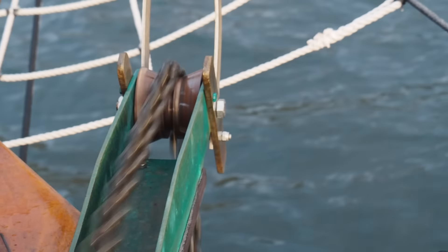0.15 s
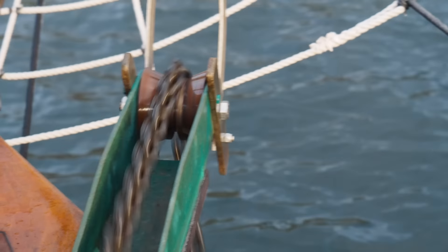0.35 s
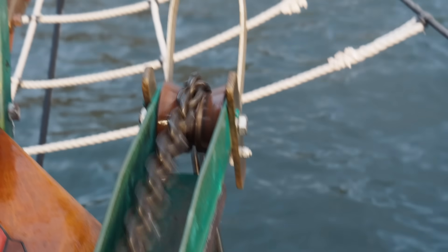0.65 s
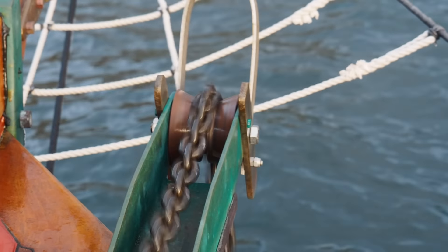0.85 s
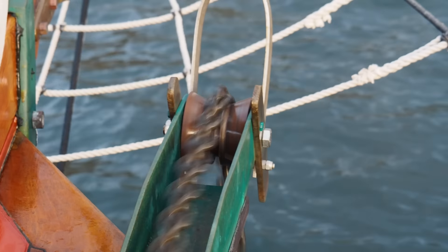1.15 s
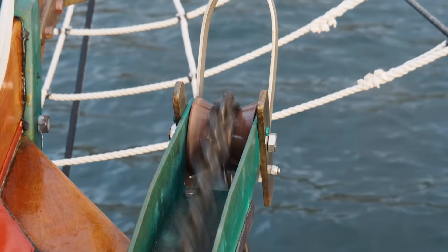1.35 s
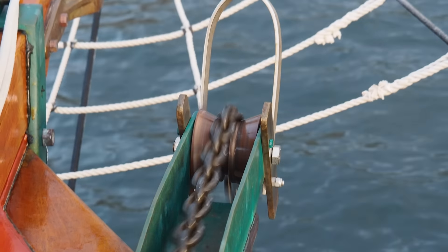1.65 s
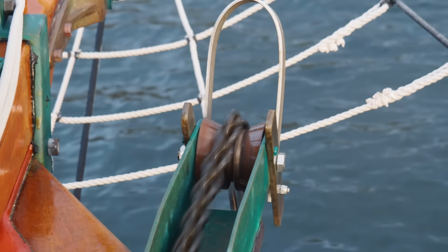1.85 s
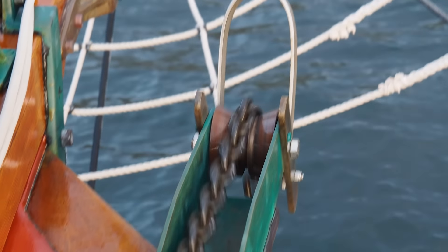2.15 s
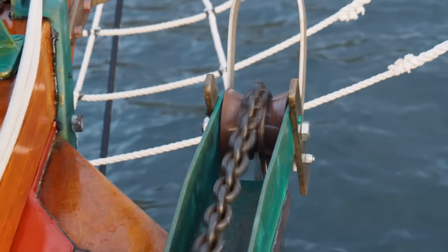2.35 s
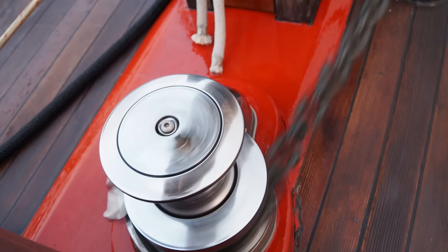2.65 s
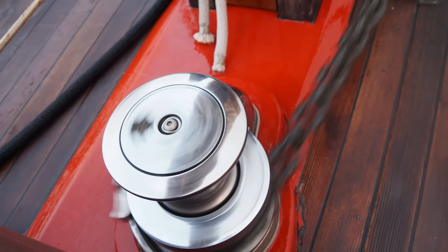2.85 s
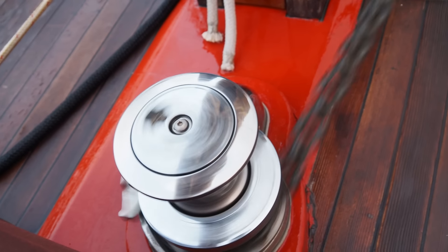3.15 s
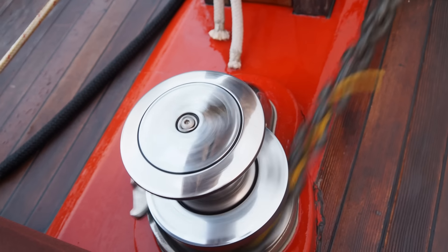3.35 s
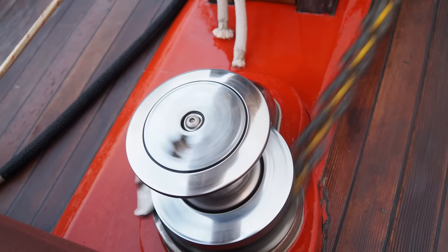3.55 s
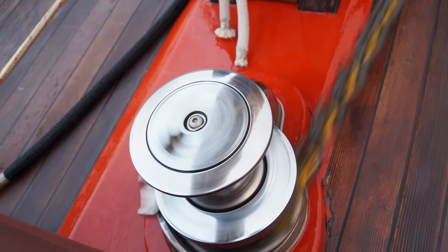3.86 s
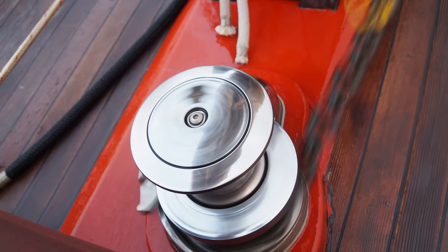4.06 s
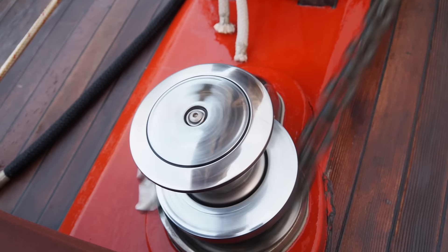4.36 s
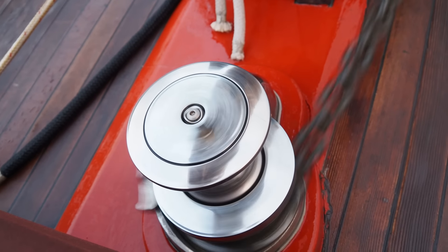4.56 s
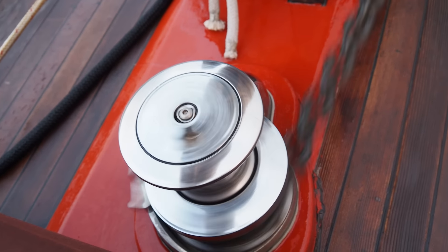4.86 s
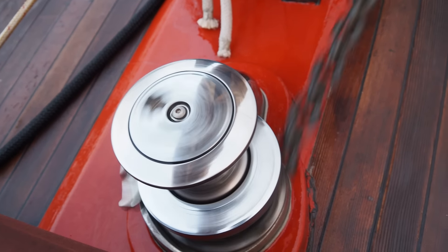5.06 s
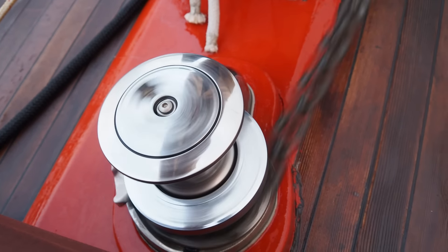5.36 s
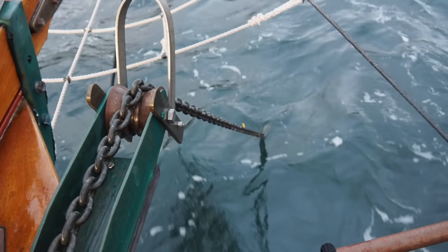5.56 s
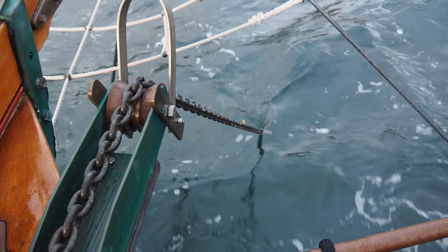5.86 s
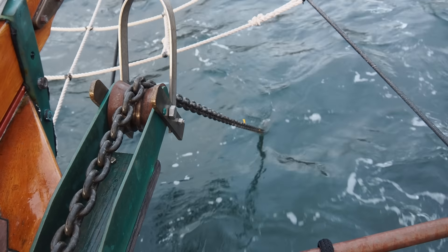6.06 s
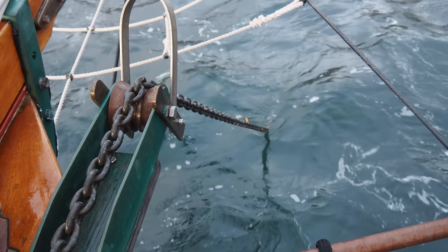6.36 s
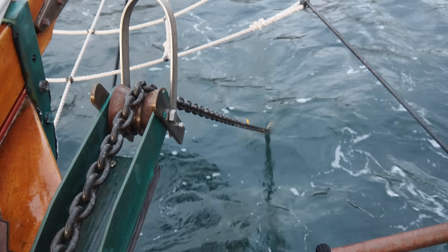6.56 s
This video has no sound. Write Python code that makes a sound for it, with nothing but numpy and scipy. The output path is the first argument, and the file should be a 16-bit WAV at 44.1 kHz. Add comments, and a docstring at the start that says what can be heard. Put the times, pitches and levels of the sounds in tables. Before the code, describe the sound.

Close up at a boat's bow, heavy anchor chain runs quickly over a metal roller, clattering evenly with deep thumps and irregular clanks. It drops away into a short silence. Then chain rattles through a windlass wheel on a wooden deck, brighter and faster, with hard snaps and short grinding. Finally engine hum and churning, gurgling water rise as the chain fades out.

```python
"""First comes anchor chain clattering over the bow roller; after a short silence, an electric windlass on deck.
The links arrive in pairs, upright then flat: shaped noise bursts clack, scrape and ring modes of the steel,
and longer noise bursts thud through the boat's structure. Clanks, snaps and grinding links stand out.
At the end the chain fades under an engine's hum of wavering sines and churning water of noise and bubbles.
Two microphone ports hear each place with its own balance, likeness and lead in time."""
import sys
import numpy as np
from scipy import signal
from scipy.fft import rfft, irfft
from scipy.io import wavfile
from scipy.ndimage import uniform_filter1d

SR = 44100
rng = np.random.default_rng(int(sys.argv[2]) if len(sys.argv) > 2 else 0)


def write(x):
    x = np.atleast_2d(x).T
    wavfile.write(sys.argv[1], SR, np.round(np.clip(x, -1, 1) * 32767).astype(np.int16))


N = 295320

# Water and engine together. Each row: time in seconds, level in dB.
WATER_LEVEL = [(5.7, -62), (5.81, -53.5), (5.9, -45.5), (6.12, -43.5), (6.3, -41), (6.7, -40.5)]
WATER_START_S = WATER_LEVEL[0][0]
# Colour of the churning water. Each row: frequency in Hz, relative density in dB per Hz.
WATER_COLOUR = [(30, -39), (55, -25), (85, -8), (130, 0), (180, 0.5), (290, -13), (390, -3.5), (560, -12),
                (640, -10), (1100, -16), (2300, -28.5), (6000, -41), (15000, -42)]
# Surges of the water. Each row: centre in seconds, lift above the churning in dB.
SURGES = [(5.91, 5.5), (5.966, 2), (6.06, 3.5), (6.22, 3.5), (6.5, 3)]
# Firing orders of the engine. Each row: multiple of ENGINE_HZ, level against the churning in dB.
ENGINE_ORDERS = [(1, -25), (2, -9.5), (3, -9.5), (4, -13.5)]
ENGINE_HZ = 57.85  # the pitch wavers around this

# The structure that blows shake, at the bow and on deck.
# Each row: frequency in Hz, relative density in dB per Hz.
ROLLER_BODY = [(35, -35), (55, -35), (80, -15.5), (125, 1), (200, 0.5), (278, -17), (385, 3.5),
               (535, -15.5), (630, 1), (820, -1.5), (1150, -18.5), (1500, -24), (3000, -39)]
DECK_BODY = [(35, -69), (60, -39), (90, -5.5), (135, 7), (200, 4), (275, -9), (370, 4.5), (500, 2),
             (565, -5.5), (620, -3), (1050, -3), (1250, -24), (1450, -1), (3000, -30.5)]
# Broad clatter of steel on steel. Each row: frequency in Hz, relative density in dB per Hz.
BOW_CLATTER = [(105, -11), (610, 1.5), (1520, -1), (2620, -11), (3620, -3.5), (5420, -3), (6320, -10.5),
               (8720, -5.5), (10420, -13.5), (12520, -16), (14020, -29), (16020, -35.5)]
DECK_CLATTER = [(105, -15.5), (610, -2.5), (1520, -2), (2220, -6), (3620, -2), (5420, 0), (6320, -4.5),
                (8520, 0), (10420, -10), (12520, -10), (14020, -22.5), (16020, -31)]
# Modes of a steel link, before detuning, scatter and the ring factor of each sound.
# Each row: frequency in Hz, half-power width in Hz, height above the clatter in dB.
LINK_MODES = [(1900, 103, 11.5), (2246, 154, 14), (3011, 92, 22), (4146, 35, 9.5), (4366, 96, 10.5),
              (5770, 83, 4), (7766, 69, 9.5), (9850, 50, 12), (12200, 160, 6), (13100, 63, 10),
              (14640, 210, 18), (15400, 370, 18.5)]

# Contacts that every pair makes. Each row: delay after arrival in seconds, level against the link in dB,
# scrape length in seconds, favoured frequency in Hz, its lift in dB, tilt in dB per octave.
BOW_CONTACTS = [(0, -5, 0.0045, 9820, 1.5, 4), (0.009, -6.5, 0.0046, 3010, 5.5, 1.3),
                (0.029, -5, 0.0072, 4250, 9.5, 1.8), (0.0412, -4.5, 0.0047, 8200, 3, 3),
                (0.049, -11, 0.017, 4300, 6.5, -2)]
DECK_CONTACTS = [(0, -6.5, 0.0027, 4160, 7.8, -0.1), (.007, -4.5, 0.013, 3180, 4.6, -1.5),
                 (.011, -10.5, 0.0045, 8940, 3.4, 3), (0.018, -8, 0.019, 2180, 4, -3),
                 (0.0245, -4.5, .007, 9870, 6.5, 2.5), (0.032, -4.5, 0.0031, 3190, 8.4, -.5)]
# Pace of the chain, held until the next row. Each row: time in seconds, pairs of links per second.
BOW_PACE = [(0, 16.66), (2.56, 0)]
DECK_PACE = [(2.757, 18.71), (3.45, 18.915), (5.25, 19.8), (5.4, 18.93), (5.98, 18.39), (6.25, 18.85),
             (6.66, 0)]
# Level of the rattle, fading out at the end of each place. Each row: time in seconds, level in dB.
BOW_LEVEL = [(0, -33), (.48, -35), (.56, -38), (.95, -34), (1.2, -35), (1.88, -34), (2.22, -38.5),
             (2.46, -50.5), (2.55, -72.5)]
DECK_LEVEL = [(2.76, -33), (3.1, -33), (3.25, -37), (3.8, -36.5), (4.33, -37.5), (4.6, -33.5), (5.0, -37),
              (5.25, -36), (6.2, -37.5), (6.32, -45.5), (6.45, -46.5), (6.53, -60.5), (6.6, -76)]
# How hard upright links land in the wheel. Each row: time in seconds, change of their level in dB.
UPRIGHT_FORCE = [(3.13, -2.5), (3.27, -2.5), (3.62, -4.5), (3.72, 0.5), (4.85, -1.5), (4.98, -2.5),
                 (5.2, 0.5), (6.5, -0.5)]

# Heavy clanks on the bow roller. Each row: time in seconds, level of the steel in dB before its weight is
# added, frequency in Hz that rings most, level of the roller's thud in dB.
CLANKS = [(0.069, -28, 700, -38), (0.127, -23, 3000, -41), (0.166, -25.5, 900, -37),
          (0.177, -24, 1900, -38), (0.445, -20.5, 2030, -38), (0.519, -21, 2970, -54),
          (0.992, -27, 1910, -44), (1.038, -43, 400, -32), (1.06, -26, 1890, -39), (1.111, -20, 1800, -47),
          (1.243, -26, 700, -42), (1.303, -26.5, 3000, -46), (1.43, -28.5, 780, -28),
          (1.452, -26, 750, -38), (1.485, -19, 1522, -38.5), (1.812, -21, 865, -33),
          (1.85, -30, 1050, -32.5), (1.901, -19.5, 1690, -33), (2.255, -21.5, 916, -37)]
# Links that snap hard into the wheel. Each row: time in seconds, level in dB before the weight is added,
# frequency in Hz that rings most.
SNAPS = [(2.782, -22.5, 3060), (2.864, -20, 4300), (2.917, -19, 4300), (2.971, -22, 4200),
         (3.026, -16, 4200), (3.078, -19.5, 4330), (3.130, -22, 4300), (3.159, -20.5, 1950),
         (3.214, -20, 3060), (3.265, -32, 7770), (3.32, -17, 3150), (3.372, -20, 2950), (3.4, -22, 2990),
         (3.425, -25, 7770), (3.482, -15, 2950), (3.586, -16.5, 7680), (3.635, -21.5, 5800),
         (3.643, -20, 3020), (3.766, -19, 3070), (3.769, -21, 4300), (3.819, -20, 4250),
         (3.872, -19.5, 3100), (4.013, -17, 3080), (4.032, -16, 3120), (4.066, -22, 3070),
         (4.086, -22, 3050), (4.111, -22, 4620), (4.253, -16, 3070), (4.280, -25, 3020), (4.330, -24, 2960),
         (4.416, -21, 3010), (4.509, -16, 3100), (4.613, -25, 4300), (4.646, -22, 3020), (4.721, -17, 4370),
         (4.774, -17.5, 3130), (4.807, -17.5, 3010), (4.826, -24, 4260), (4.857, -21.5, 7850),
         (4.94, -18, 3140), (5.042, -23, 3100), (5.071, -21, 2980), (5.122, -17, 3080), (5.228, -17, 3050),
         (5.246, -23, 4300), (5.275, -16.5, 9000), (5.331, -16, 3060), (5.373, -20, 3100),
         (5.561, -18.5, 4200), (5.696, -17.5, 3040), (5.718, -22.5, 4170), (5.875, -16, 4200),
         (5.982, -25, 4300), (6.206, -22.5, 4270), (6.327, -24.5, 3050), (6.441, -33, 4300)]
# Links that bind and grind in the wheel. Each row: start in seconds, level in dB, length in seconds.
DRAGS = [(2.781, -39, 0.019), (2.867, -37, 0.04), (3.086, -36, .026), (3.54, -38.5, 0.018),
         (3.613, -41, 0.028), (3.794, -39.5, 0.018), (4.042, -43, 0.031), (4.364, -44, 0.041),
         (4.842, -42.5, 0.015), (5.146, -38.5, 0.029), (5.204, -36.5, .027), (5.242, -38, .03),
         (5.485, -38.5, 0.015), (5.568, -43, 0.021)]

# How the two microphone ports hear each source.
# Each row: frequency in Hz, left-right coherence from 0 to 1, left minus right in dB.
BOW_PORTS = [(100, 1, 0), (350, 0.98, 0.5), (900, 1, 0), (1900, 0.83, 0.9), (3100, 0.85, 3.5),
             (8000, 0.38, 4), (14000, .3, 2.5)]
DECK_PORTS = [(110, 0.77, 3), (250, 0.45, 5.5), (447, 0.68, 4.5), (839, 0.69, -1.2), (1910, 0.9, 0.5),
              (3080, 0.63, 1), (7700, 0.3, -0.5), (14000, 0.44, -3)]
WATER_PORTS = [(55, 0.34, -7), (110, 0.72, -1), (218, 0.9, 0.5), (450, 0.96, 3), (2030, 0.63, -1),
               (10000, 0.2, -1.5)]
# Each place: its ports, and the seconds by which the left port leads.
AT_BOW, AT_DECK, AT_WATER = (BOW_PORTS, 0.00009), (DECK_PORTS, -0.000022), (WATER_PORTS, 0)

SIZE = 4096  # samples in one contact sound
HZ, AGE = np.fft.rfftfreq(SIZE, 1 / SR), np.arange(SIZE) / SR
ROLLER_DB = -8  # thud of the roller against the rattle, before the share of each link
DULLING = 0.078  # softer contacts are duller: tilt in dB per octave for each dB below the median link
BOW_FIRST_BLOW, DECK_FIRST_BLOW = 0.35, 1.1  # force of the landing against about one snag of the skid
PAUSE_START_S, PAUSE_END_S = 2.578, 2.777
CEILING = 0.105  # share of full scale toward which the recorder rounds off peaks
EDGE_HZ = 15900  # upper band limit


def amp(db):
    """Decibels to gain."""
    return 10 ** (np.asarray(db) / 20)


def read(points, hz):
    """A spectrum, joined by straight lines over log frequency."""
    f, value = np.transpose(points)
    return np.interp(np.log(hz + 1), np.log(f + 1), value)


def add(mix, s, sound):
    """Lays a stereo sound into the mix at time s."""
    part = mix[:, max(0, round(s * SR)):][:, :sound.shape[1]]
    part += sound[:, :part.shape[1]]


def causal(db):
    """The minimum-phase response with this gain: it only rings after its cause."""
    cepstrum = irfft(np.log(amp(np.maximum(db, -100))))
    cepstrum[..., 1:SIZE // 2] *= 2
    cepstrum[..., SIZE // 2 + 1:] = 0
    return np.exp(rfft(cepstrum))


def ports(spectra, hz, place):
    """Two unrelated spectra become a left and right port that hear partly alike; one may lead."""
    table, lead_s = np.array(place[0]), place[1]
    same = np.clip(read(table[:, :2], hz), 0, 1)
    lean = amp(read(table[:, ::2], hz) / 2)
    right = same * spectra[0] + np.sqrt(1 - same ** 2) * spectra[1]
    right = right * np.exp(-2j * np.pi * hz * lead_s)
    return np.array([spectra[0] * lean, right / lean])


def blows(times, level_db, force, colour_db, place, span_s):
    """Each force rings a body of the given colour; the level counts its energy as if spread over span_s."""
    sounds = irfft(ports(rfft(force), HZ, place) * causal(colour_db))
    sounds *= np.minimum(10 * (1 - AGE / AGE[-1]), 1)  # the last tenth fades out
    sounds /= np.sqrt((sounds ** 2).mean(0).sum(-1) / (span_s * SR))[:, None]
    mix = np.zeros((2, N))
    for k, s in enumerate(times):
        add(mix, s, amp(level_db[k]) * sounds[:, k])
    return mix


def gurgles(count=170, low_hz=115, high_hz=600, cycles=3.3, rise=0.057, spread_db=2.0):
    """Pockets of air ring in the water, each rising a little in pitch; the small ones are fainter."""
    mix = np.zeros((2, N))
    for when, pitch, chance, side in rng.random((count, 4)):
        hz = low_hz * (high_hz / low_hz) ** pitch
        life = AGE * hz / cycles
        swell = life * np.exp(1 - 2 * life) * (1 - AGE / AGE[-1])
        bubble = swell * np.sin(2 * np.pi * cycles * life * (1 + rise * life))
        start = WATER_START_S + when * (N / SR - WATER_START_S)
        strength = amp(-spread_db * np.log(chance)) * low_hz / hz
        add(mix, start, strength * np.array([[1 + side], [2 - side]]) * bubble)
    return mix / mix[:, round(WATER_START_S * SR):].std()


def engine_and_water(waver=0.0072, flutter=0.21, surge_s=0.027, gurgle_db=-8):
    """A wavering engine hum swells up together with water that churns, gurgles and surges."""
    t, hz = np.arange(N) / SR, np.fft.rfftfreq(N, 1 / SR)
    noise = ports(rfft(rng.standard_normal((2, N))), hz, AT_WATER)
    water = irfft(noise * amp(read(WATER_COLOUR, hz)), N)
    knots = np.linspace(0, t[-1], num=80)

    def drift():
        return np.interp(t, knots, rng.standard_normal(len(knots)))

    turns = np.cumsum(ENGINE_HZ * (1 + waver * drift())) / SR
    hum = np.zeros(N)
    for order, db in ENGINE_ORDERS:
        tone = np.sqrt(2) * np.sin(2 * np.pi * (order * turns + rng.random()))
        hum += amp(db) * (1 + flutter * drift()) * tone
    surge_db = sum(db * np.exp(-((t - s) / surge_s) ** 2) for s, db in SURGES)
    churn = amp(surge_db - 0.5) * (water / water.std() + amp(gurgle_db) * gurgles())
    return amp(np.interp(t, *np.transpose(WATER_LEVEL), left=-150)) * (churn + hum)


def thuds(times, level_db, body, place, t60, span_s):
    """Heavy blows die away in the many low modes of the structure; t60 is the force's 60 dB decay in s."""
    force = rng.standard_normal((2, len(times), SIZE)) * amp(-60 * AGE / t60)
    return blows(times, level_db, force, read(body, HZ), place, span_s)


def link_ring(count, detune_hz=25, spread_db=2.5):
    """Gain of the modes in dB, one row a link: no two links are quite alike."""
    power = np.ones((count, len(HZ)))
    for hz, width, db in LINK_MODES:
        shift, strength = rng.standard_normal((count, 2)).T[:, :, None]
        offset = HZ - hz - detune_hz * shift
        power += amp(db + spread_db * strength) ** 2 / (1 + (2 * offset / width) ** 2)
    return 10 * np.log10(power)


def hit_colour(count, patchy_db=1.95):
    """Broad humps and dips in dB, one row a contact: every touch meets the steel at another spot."""
    knots = np.geomspace(500, 16000, num=14)
    rows = rng.standard_normal((count, len(knots)))
    return np.array([np.interp(HZ, knots, patchy_db * row) for row in rows])


def scrape(count, length_s, first_blow, echo_db, snags_per_s=1700, snag_db=0.5, snag_s=0.00078,
           echo_t60=0.14, echo_hz=4200):
    """Force of a link that lands and skids: a first blow, a burst of snags, and duller echoes."""
    length = length_s * np.exp(0.19 * rng.standard_normal((count, 1)))
    size = amp(snag_db * np.minimum(rng.exponential(1, (count, SIZE)), 3))
    caught = rng.random((count, SIZE)) < snags_per_s / SR
    snags = size * caught * np.exp(-(AGE / length) ** 2 / 2)
    snags[:, 0] = first_blow

    def spread(decay):
        power = signal.fftconvolve(snags ** 2, decay[None], axes=1)[:, :SIZE]
        return np.sqrt(abs(power))

    direct, echo = rng.standard_normal((2, 2, count, SIZE))
    direct *= spread(np.exp(-AGE / snag_s))
    echo *= spread(amp(echo_db - 60 * AGE / echo_t60) ** 2)
    pole = np.exp(-2 * np.pi * echo_hz / SR)
    return direct + signal.lfilter([1 - pole], [1, -pole], echo)


def chain(links, contacts, clatter, link_s, ring, place, first_blow, echo_db, spread_db, detune_hz,
          jitter_s=0.0016, favour_hz=240, tilt_spread=0.53):
    """Every pair makes the same round of contacts; where a link is struck decides which mode it favours."""
    s, upright_db, flat_db = np.transpose(links)[:3]
    mix = np.zeros((2, N))
    for k, (delay, db, length_s, hz, lift_db, tilt) in enumerate(contacts):
        late, strength, hardness = rng.standard_normal((len(s), 3)).T
        link_db = upright_db if delay < 0.022 else flat_db
        slope = tilt + tilt_spread * hardness + DULLING * (link_db - np.median(link_db))
        colour = read(clatter, HZ) + ring * link_ring(len(s), detune_hz)
        colour += slope[:, None] * np.log2(HZ + 450)  # the tilt levels off in the bass
        colour += lift_db / (1 + ((HZ - hz) / favour_hz) ** 2) + hit_colour(len(s))
        times = s + delay + (k > 0) * jitter_s * late  # the first contact keeps its time
        force = scrape(len(s), length_s, first_blow, echo_db)
        mix += blows(times, link_db + db + spread_db * strength, force, colour, place, link_s)
    return mix


def knocks(rows, clatter, place, octaves, length_s, heaviness, ring, rest_db):
    """A slack link snaps on steel and rings most near one pitch; lower clunks are heavier and longer."""
    s, level_db, hz = np.transpose(rows)
    distance = np.log2((HZ + 1) / hz[:, None]) / octaves
    focus = 10 * np.log10((1 + distance ** 2) ** -2 + amp(rest_db) ** 2)
    colour = ring * link_ring(len(s)) + read(clatter, HZ) + focus
    weight = (hz.max() / hz) ** heaviness
    force = scrape(len(s), length_s * weight[:, None], first_blow=2.5, echo_db=-22)
    return blows(s, level_db + 10 * np.log10(weight), force, colour, place, span_s=0.00023)


def arrivals(pace):
    """The times at which each new pair of links comes up."""
    s, rate = np.transpose(pace)
    passed = np.append(0, np.cumsum(np.diff(s) * rate[:-1]))
    return np.interp(np.arange(passed[-1]), passed, s)


def bow_links(scatter_db=1.0, thud_scatter_db=1.4):
    """Pairs cross the roller evenly, each a little different: rows of (s, upright dB, flat dB, thud dB)."""
    s = arrivals(BOW_PACE)
    level = np.interp(s, *np.transpose(BOW_LEVEL))
    upright, flat, thud = rng.standard_normal((len(s), 3)).T
    thud_db = level + ROLLER_DB + thud_scatter_db * thud
    return np.transpose([s, level + scatter_db * upright, level + scatter_db * flat, thud_db])


def bow_roller():
    """Chain over the roller: both links of a pair rattle and thump it, and heavy clanks shake it hard."""
    links = bow_links()
    s, _, _, thud_db = links.T
    rattle = chain(links, BOW_CONTACTS, BOW_CLATTER, link_s=0.024, ring=0.94, place=AT_BOW,
                   first_blow=BOW_FIRST_BLOW, echo_db=-12.0, spread_db=2.15, detune_hz=42, jitter_s=0.0018)
    upright = thuds(s + 0.00893, thud_db - 6.0, ROLLER_BODY, AT_BOW, t60=0.1, span_s=0.057)
    flat = thuds(s + 0.04, thud_db - 8.5, ROLLER_BODY, AT_BOW, t60=0.21, span_s=0.067)
    clanks = np.array(CLANKS)
    steel = knocks(clanks[:, :3], BOW_CLATTER, AT_BOW, octaves=0.61, length_s=0.0049,
                   heaviness=0.48, ring=0.97, rest_db=-19.5)
    body = thuds(clanks[:, 0], clanks[:, 3], ROLLER_BODY, AT_BOW, t60=0.074, span_s=0.0016)
    return rattle + upright + flat + steel + body


def drags():
    """A link that binds grinds through the wheel for a moment, and the deck groans under it."""
    s, db, length_s = np.transpose(DRAGS)
    envelope = np.minimum(AGE / 0.004, 1) * np.exp(-(AGE / length_s[:, None]) ** 4)
    force = rng.standard_normal((2, len(s), SIZE)) * envelope
    colour = read(DECK_CLATTER, HZ) + 1.05 * link_ring(len(s)) + hit_colour(len(s))
    colour -= 1.1 * np.log2(HZ + 450)
    grind = blows(s, db, force, colour, AT_DECK, span_s=0.02)
    return grind + thuds(s, db - 7.5, DECK_BODY, AT_DECK, t60=0.16, span_s=0.019)


def deck_links(upright_scatter_db=1.93, flat_scatter_db=1.4):
    """Pairs enter the wheel steadily, upright links less evenly: rows of (s, upright dB, flat dB)."""
    s = arrivals(DECK_PACE)
    level = np.interp(s, *np.transpose(DECK_LEVEL))
    force_db = np.interp(s, *np.transpose(UPRIGHT_FORCE))
    upright, flat = rng.standard_normal((len(s), 2)).T
    upright_db = level + force_db + upright_scatter_db * upright
    return np.transpose([s, upright_db, level + flat_scatter_db * flat])


def windlass():
    """Chain through the toothed wheel; links shake the wooden deck as they seat, some snap in or bind."""
    links = deck_links()
    s, upright_db, flat_db = links.T
    rattle = chain(links, DECK_CONTACTS, DECK_CLATTER, link_s=0.025, ring=1.0, place=AT_DECK,
                   first_blow=DECK_FIRST_BLOW, echo_db=-18, spread_db=1.1, detune_hz=12.9)
    upright = thuds(s + 0.009, upright_db - 16.0, DECK_BODY, AT_DECK, t60=0.26, span_s=0.021)
    flat = thuds(s + 0.031, flat_db - 13.0, DECK_BODY, AT_DECK, t60=0.26, span_s=0.019)
    snaps = knocks(SNAPS, DECK_CLATTER, AT_DECK, octaves=0.2, length_s=0.0023,
                   heaviness=0.04, ring=1.0, rest_db=-15.5)
    return rattle + upright + flat + drags() + snaps


def scene():
    """Bow roller, then windlass, then engine and water; a high-pass keeps deep bass out of the chain sounds."""
    low_cut = signal.butter(N=4, Wn=68, btype="high", fs=SR, output="sos")
    return signal.sosfilt(low_cut, bow_roller() + windlass()) + engine_and_water()


def record(dry):
    """Silence between the two places, softly rounded peaks, and the band limit."""
    t = np.arange(N) / SR
    outside_pause = (t < PAUSE_START_S) | (t > PAUSE_END_S)
    heard = uniform_filter1d(1.0 * outside_pause, size=100)  # short ramps, in samples
    rounded = CEILING * np.tanh(dry * heard / CEILING)
    band = signal.firwin(511, EDGE_HZ, window=("kaiser", 9), fs=SR)
    return signal.oaconvolve(rounded, band[None], "same")


dry = scene()
out = record(dry)
write(out)
```